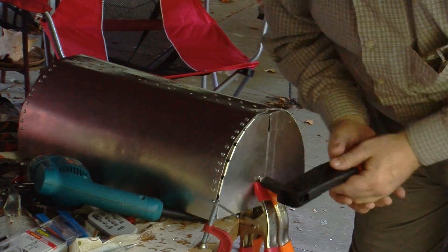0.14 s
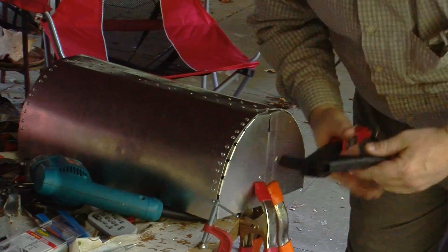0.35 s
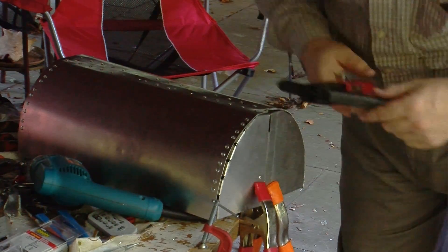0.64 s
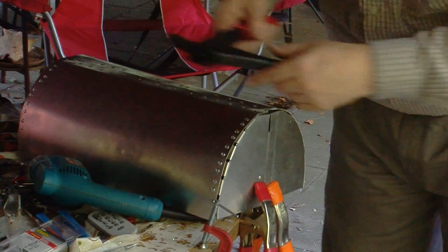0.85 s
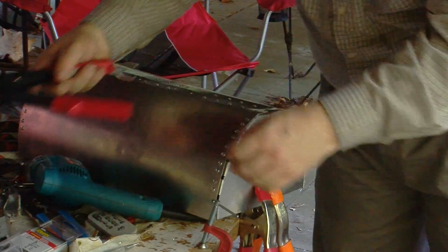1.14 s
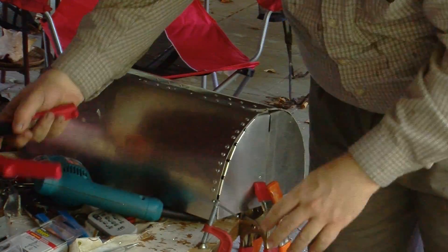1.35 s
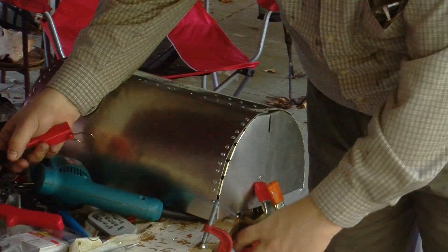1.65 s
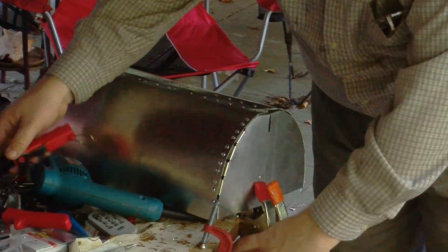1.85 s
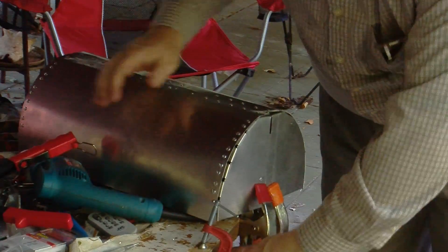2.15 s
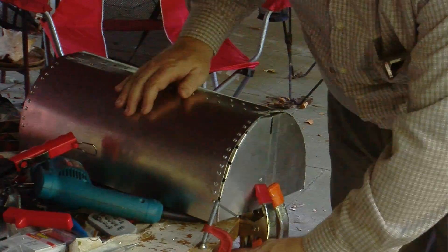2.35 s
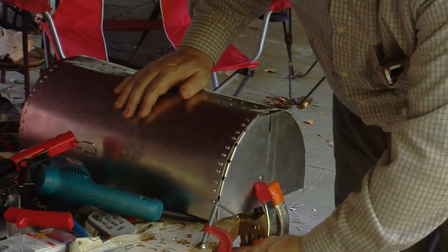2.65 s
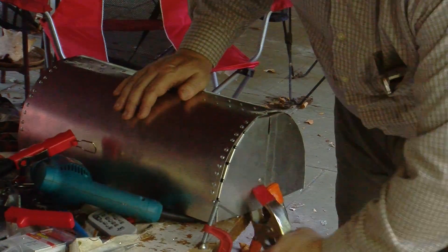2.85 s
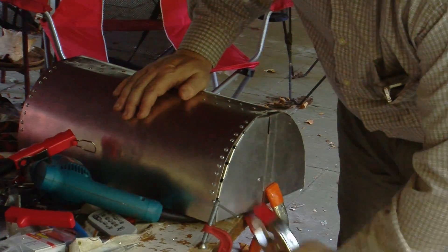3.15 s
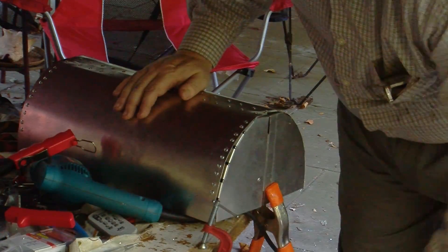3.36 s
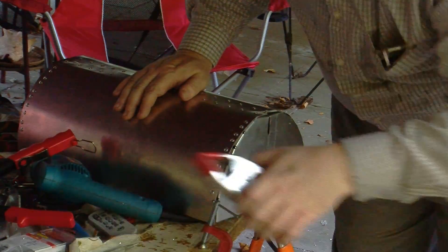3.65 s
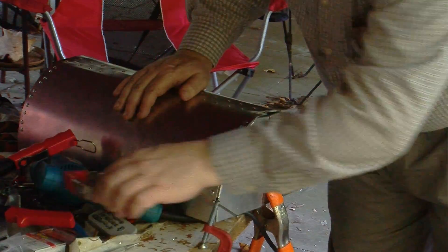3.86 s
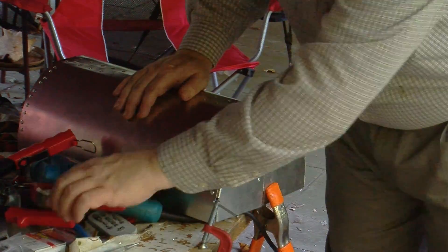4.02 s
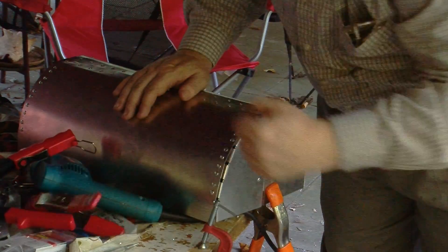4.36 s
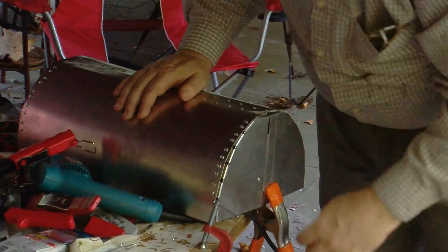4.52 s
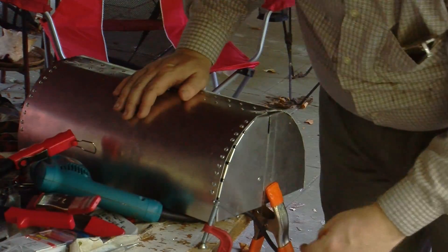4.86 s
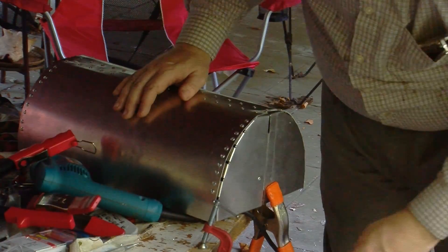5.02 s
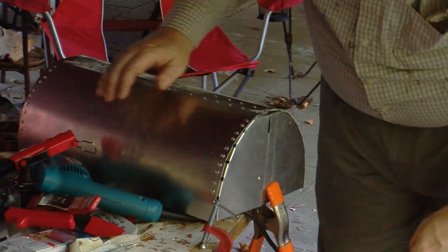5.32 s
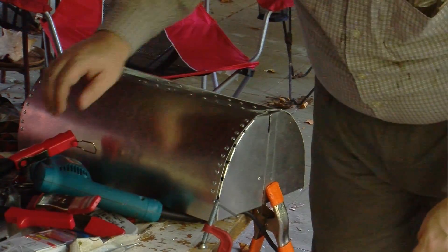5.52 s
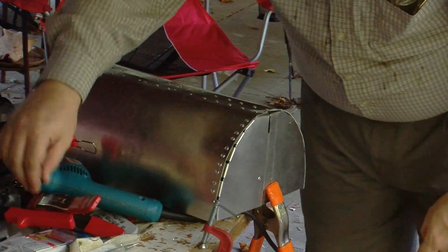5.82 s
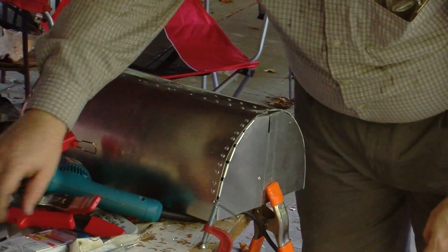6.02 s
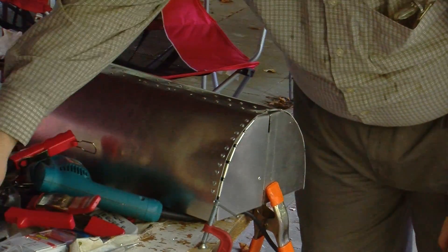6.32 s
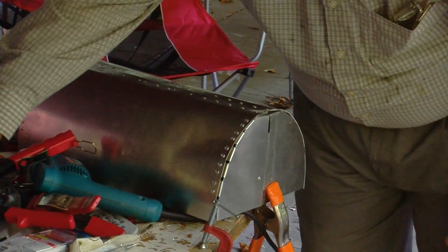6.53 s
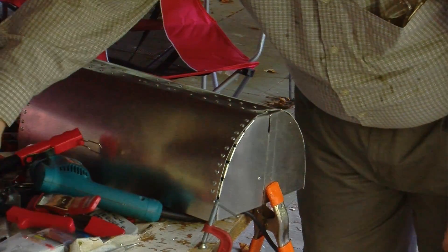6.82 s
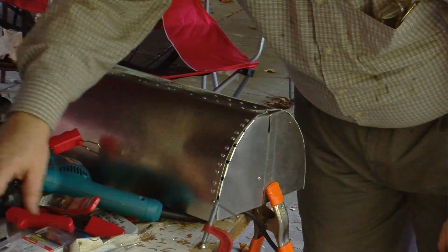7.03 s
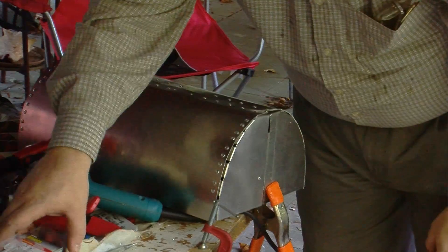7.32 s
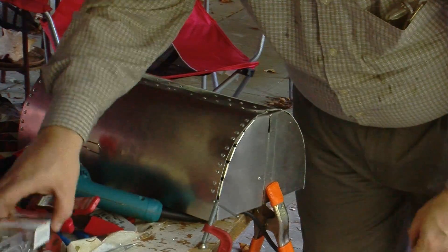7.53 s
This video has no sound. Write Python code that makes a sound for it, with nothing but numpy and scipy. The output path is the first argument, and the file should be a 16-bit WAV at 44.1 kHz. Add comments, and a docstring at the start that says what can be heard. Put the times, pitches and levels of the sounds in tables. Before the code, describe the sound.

One sharp crack with a short tinny ring, then hand tools knocking down on a bench and light rummaging over faint distant traffic.

```python
"""At a covered work place, a hand riveter snaps the stem of a pop rivet in a sheet-metal drum: a crack and
the ringing modes of the shell, with a low thud of the overloaded preamplifier, in the right channel.
The riveter and then a spring clamp are put down on a cluttered wooden bench, as decaying noise and modes;
a hand rummages among the tools, with grainy scrapes, steel ticks and faint rustles.
Short echoes surround the work; far traffic, air and a thin band of insects are shaped noise behind it."""
import sys
import numpy as np
from scipy import signal
from scipy.fft import rfft, irfft, next_fast_len
from scipy.io import wavfile
from scipy.ndimage import map_coordinates

SR = 44100
rng = np.random.default_rng(int(sys.argv[2]) if len(sys.argv) > 2 else 0)


def output_pcm(signal):
    """Save a mono or channel-first signal as 16-bit PCM at the path in sys.argv[1].

    Samples are clipped to [-1, 1] before scaling.
    """
    pcm = np.clip(np.atleast_2d(signal).T, -1, 1) * 32767
    wavfile.write(sys.argv[1], SR, np.round(pcm).astype(np.int16))


N = 338688

# Spectrum of hard contact. Each row: frequency in Hz, relative density in dB per Hz.
HARD_CONTACT = [(2000, 2), (3500, 5), (5000, 4.5), (6300, -2), (8500, -4), (10500, -9), (15500, -17.5)]


def rivet():
    """Impulsive excitation: the stem breaks, the preamplifier thuds and the shell rings in its modes."""
    # Strong modes of the drum's shell. Each row: frequency in Hz, relative level in dB.
    strong_modes = [(331, -52.5), (506.0, -57), (580, -54), (656.8, -56), (705.2, -57), (920.5, -58),
                    (1152, -58), (1250, -53), (1353, -60), (1822, -53.5), (2073, -59), (2239, -62),
                    (2385, -58.5), (2421, -57), (2939, -65), (3009, -66), (3165, -58), (3209, -57.5),
                    (3325, -62), (3413, -68.5)]
    # Faint highest modes of the shell. Each row: frequency in Hz, relative level in dB.
    faint_modes = [(4113, -63), (4511, -62), (5276, -61.5), (5405, -65.5), (6094, -62), (6826, -65.5),
                   (8936, -67)]
    # Decay of these modes. Each row: frequency in Hz, t60 in seconds.
    mode_t60 = [(200, 0.22), (600, 0.35), (1300, .28), (3200, 0.31), (7000, 0.17)]
    # Tilt of the first burst, brighter than the ring. Each row: frequency in Hz, gain in dB.
    crack_tilt = [(100, -3), (310, -10), (590, 1), (1200, -0.5), (3200, 1), (7000, -2), (15000, 3.5)]
    # The many weak modes of the shell. Each row: frequency in Hz, relative density in dB per Hz.
    weak_modes = [(60, -45.5), (200, -29), (800, -18), (2800, -16.5), (6000, -20.5), (9500, -22.5),
                  (15500, -32.5)]
    # Groups into which weak modes crowd. Each row: centre in Hz, width in Hz, relative level in dB.
    mode_groups = [(299.6, 200, -2), (627, 38, 2.5), (934, 100, -3.5), (1235.4, 78, -2), (1825, 170, -2.5),
                   (2416, 59, -7.5), (3240, 210, -3.5), (4370, 290, -17.5), (5403, 290, -13),
                   (6940, 410, -17.5), (8850, 540, -19.5)]
    # Decay of the weak modes. Each row: frequency in Hz, t60 in seconds.
    weak_t60 = [(150, 0.38), (600, .32), (2000, 0.37), (5000, 0.37), (12000, 0.25)]
    # Reflection from a far wall. Each row: frequency in Hz, relative gain in dB.
    wall_reflection = [(100, -17), (300, 10), (650, 11), (1100, -11), (2200, -24), (9000, -12)]
    snap_s, wall_delay_s = 0.0265, 0.085

    def shell(hz):
        """Modal density: the weak modes form a broad response with crowded groups on top."""
        groups = sum(amp(db) * hump(hz, centre, width) for centre, width, db in mode_groups)
        return amp(along(weak_modes, hz)) + groups

    out = np.zeros(N)
    t = np.arange(SR) / SR
    crack = amp(-5.5) * unit(filtered(noise(crack_tilt, len(t)), shell)) * fade(t, 0.069)
    # a low thud of the overloaded preamplifier
    low_push_spectrum = [(20, 5), (60, -1), (100, -8.5), (170, -11), (500, -70.5)]  # (Hz, dB per Hz)
    low_push = amp(-25) * noise(low_push_spectrum, len(t)) * fade(t, 0.12)
    shiver = amp(-22.0) * dying(unit(filtered(rng.standard_normal(len(t)), shell)), weak_t60)
    ring = sum(amp(db) * mode(hz, t, along(mode_t60, hz)) for hz, db in [*strong_modes, *faint_modes])
    onset = 1 - np.exp(-t / 0.000304)
    add(out, snap_s, (crack + low_push + shiver + amp(25.5) * ring) * onset)
    # a far wall throws the body of the bang back
    echo = amp(-25.5) * filtered(out, lambda hz: amp(along(wall_reflection, hz)))
    add(out, wall_delay_s, echo)
    return out


def knocks():
    """Impact: each landing is a click, a clack with the tool's modes, and a thump of the bench top."""
    # Tools landing on the bench and on each other. Each row: start in seconds, tool, then relative
    # levels of landing, thump and click in dB, and body resonance in Hz.
    landings = [(1.652, "clutter", -32.5, -27, -16, 590), (1.659, "clutter", -24.5, -30, -28, 690),
                (1.708, "riveter", -36, -32, -2.5, 730), (1.853, "riveter", -20.5, -10.5, -9.5, 543),
                (2.024, "riveter", -23.5, -7.5, -13, 667), (3.011, "clutter", -38.5, -11, -22, 607),
                (4.181, "clamp", -37.5, -12.5, -1.5, 840), (4.188, "clamp", -32, -29, -15.5, 554),
                (4.293, "clutter", -34.5, -37, -16, 546), (4.384, "clutter", -34.5, -35, -21, 810),
                (4.43, "clutter", -37.5, -33, -24, 690), (4.471, "clamp", -33.5, 1, -9, 478),
                (4.482, "clamp", -22.5, -12, -11.5, 712), (6.841, "clutter", -47, -1, -19, 685),
                (6.89, "clutter", -37, -12, -7, 530), (6.932, "clutter", -38, -33, -7.5, 498),
                (6.966, "clutter", -32.5, -33, -19, 680), (7.409, "clutter", -30.5, -35, -24, 666)]
    # Modes of each struck tool. Each row: frequency in Hz, relative level in dB, t60 in seconds.
    tool_modes = {"riveter": [(1120, -11.5, .03), (2390, -3, 0.021), (4660, -21, 0.018), (5470, -18, 0.028),
                  (7320, -21, 0.022)], "clamp": [(1670, -5.5, 0.024), (2090, -3, 0.019), (2900, -14, .03),
                  (3610, -9, 0.023), (4320, -6, 0.018), (5250, -14.5, 0.023)],
                  "clutter": [(1071, -3, 0.027), (1464, -15.5, 0.034), (2110, -21, 0.069),
                  (3280, -34, 0.023)]}
    # Noise of the tool bodies. Each row: frequency in Hz, relative density in dB per Hz.
    clack_spectrum = [(240, -45), (400, -12.5), (686, -1), (1120, -6.5), (1430, -17), (1620, -8),
                      (1870, -15), (2350, -6.5), (2910, -12.5), (3670, -29), (4000, -52), (5200, -44),
                      (8800, -120)]
    # Bench modes. Each row: nominal frequency in Hz, mean relative level in dB, t60 in seconds.
    bench_modes = [(125, -11, 0.36), (153.4, -1.5, 0.25), (183, -.5, .19), (214.6, 6, 0.083),
                   (267, -3.5, 0.21), (336.7, -2.5, .2), (367, -1, 0.061)]
    # How low each tool can shake the bench. Each entry: tool, edge in Hz.
    lowest_hz = {"riveter": 121, "clamp": 205, "clutter": 151}
    clack_t60, click_t60 = 0.038, 0.033  # s

    out = np.zeros(N)
    t = np.arange(SR // 2) / SR
    contact = 1 - np.exp(-t / 0.0008)
    for s, name, db, thump_db, click_db, body_hz in landings:
        clack = amp(-6.0) * noise(clack_spectrum, len(t)) * fade(t, clack_t60)
        body = amp(-7) * mode(body_hz, t, t60=0.061)
        ring = body + sum(amp(level) * mode(hz, t, life) for hz, level, life in tool_modes[name])
        click = amp(click_db + 1.5) * noise(HARD_CONTACT, len(t)) * fade(t, click_t60)
        tool = with_room(clack * contact + click, wet_db=-6.0) + with_room(ring * contact, wet_db=-12.5)
        # the bench's modes swing up together, each at a new strength and slightly new pitch
        strengths_db = rng.normal(0, 2, len(bench_modes))
        thump = np.zeros(len(t))
        for (hz, level, life), extra_db in zip(bench_modes, strengths_db):
            detuned_hz = hz * rng.normal(1, 0.014)
            thump += amp(level + extra_db) * np.sin(2 * np.pi * detuned_hz * t) * fade(t, life)
        swing_up = 1 - np.exp(-(t / 0.0021) ** 2)
        thump = amp(thump_db - 2.0) * high_pass(thump * swing_up, lowest_hz[name])
        add(out, s, amp(db + 1.0) * (tool + thump))
    return out


def drags():
    """Stick-slip friction: sliding tools catch and slip in grains, scratch, and shake the bench."""
    # Tools dragged over the bench. Each row: start in seconds, length in seconds before release,
    # relative scrape level in dB, relative bench rumble level in dB.
    pushes = [(1.656, 0.03, -31.5, -52), (1.711, 0.051, -34.5, -42), (1.77, 0.049, -34.5, -60),
              (1.857, 0.047, -37.5, -41), (2.972, 0.057, -53, -56), (3.192, 0.091, -57, -55),
              (4.187, 0.068, -46.5, -48.5), (4.268, 0.038, -42, -76), (6.848, 0.11, -54.5, -46.5),
              (6.97, 0.071, -40, -58.5), (7.396, 0.017, -37.5, -62)]
    # Sliding noise. Each row: frequency in Hz, relative density in dB per Hz.
    sliding_spectrum = [(240, -27), (400, -27), (680, 5), (804, -8.5), (1100, 0.5), (1230, -9), (1430, -11),
                        (2090, -9.5), (2790, -15.5), (4670, -26), (5600, -31), (7580, -31.5),
                        (15000, -43.5)]

    scrape, rumble = np.zeros(N), np.zeros(N)
    for s, length, scrape_db, rumble_db in pushes:
        shove = stroke(s, length, attack_s=0.011, sag_db=7, release_s=0.13)
        scrape += amp(scrape_db) * shove
        rumble += amp(rumble_db) * shove
    # a thin steel part sings along with the sliding
    singing = lambda hz: 1 + amp(9.0) * hump(hz, centre_hz=4790, width_hz=170)
    grit = filtered(noise(sliding_spectrum, N), singing)
    slips = unit(amp(3.3 * wobble(450)) * grit)
    scratches = unit(amp(6 * wobble(500)) * noise(HARD_CONTACT, N))
    wood = noise([(80, -54), (150, -6), (330, -6), (500, -13.0), (900, -48.0)], N)
    sliding = amp(-1.5) * scrape * (slips + amp(-15.5) * scratches)
    return with_room(sliding + amp(-1) * rumble * wood, wet_db=-6.0)


def ticks():
    """Light impact of small steel parts: broadband contact noise with one very brief resonance."""
    # Touches of jaws, springs and small parts. Each row: start in seconds, relative level in dB,
    # resonance in Hz, relative ring level in dB.
    touches = [(.296, -39.5, 4300, -1), (.388, -43, 2970, 6), (.392, -35.5, 2890, 8.5),
               (.477, -41, 3060, 3), (.661, -44.5, 7000, -8), (3.045, -46.5, 3450, 0),
               (3.262, -49.5, 4660, -1), (3.333, -42.5, 3200, -14), (3.425, -51, 3210, 1),
               (4.372, -53, 5060, 7), (6.14, -57, 4240, -3), (6.339, -48, 2840, -1), (6.417, -50, 3960, -6),
               (6.933, -34, 3400, 1), (7.49, -44, 4700, -2), (7.604, -46.5, 2930, 0)]
    # Noise of small steel parts. Each row: frequency in Hz, relative density in dB per Hz.
    steel_spectrum = [(500, -11), (1200, 8), (2500, 17.5), (5000, 3), (8500, -1.5), (10500, -13),
                      (15000, -13.5)]

    out = np.zeros(N)
    t = np.arange(SR // 3) / SR
    onset = 1 - np.exp(-t / 0.0005)
    for s, db, ring_hz, ring_db in touches:
        contact = with_room(noise(steel_spectrum, len(t)) * fade(t, 0.036) * onset, wet_db=-7.5)
        ring = amp(ring_db) * mode(ring_hz, t, t60=0.023)
        add(out, s, amp(db - 6.5) * (contact + ring))
    return out


def brushes():
    """Soft friction: cloth and skin rustle faintly in fine, uneven grains."""
    # A sleeve and fingers brushing over the clutter. Each row: start in seconds, length in seconds
    # before release, relative level in dB.
    rubs = [(2.3, .13, -71), (2.89, 0.15, -67.5), (3.187, 0.17, -70), (7.346, 0.23, -63.5)]
    pressure = sum(amp(db) * stroke(s, length, attack_s=0.03, sag_db=2, release_s=0.22)
                   for s, length, db in rubs)
    cloth = noise([(1500, -24.5), (3500, 0.5), (5000, 3), (8500, -5), (10500, -8.5), (15000, -11.0)], N)
    return amp(-4) * pressure * unit(amp(4 * wobble(250)) * cloth)


def outdoors():
    """Stationary noise and distance: traffic recedes over a steady murmur of air and insects."""
    # Far traffic. Each row: frequency in Hz, relative density in dB per Hz.
    traffic_spectrum = [(150, -25.5), (350, -9), (650, 1), (1100, 1), (2200, -5.5), (3300, -15.5),
                        (6000, -32.5), (12000, -53)]
    # Murmur of the air. Each row: frequency in Hz, relative density in dB per Hz.
    air_spectrum = [(20, -20.5), (60, -12.5), (110, -6.5), (155, 1.5), (220, -7), (450, -6.5), (800, -5.5),
                    (1200, -12), (2200, -16.5), (3300, -24.5), (5500, -32), (8500, -34.5), (10000, -37.5),
                    (16000, -39.5)]
    # Thin band of insects. Each row: frequency in Hz, relative density in dB per Hz.
    insect_spectrum = [(5900, -39.5), (6200, -3.5), (6380, -0.5), (6650, -6.5), (6830, -1.5), (7050, -19),
                       (7700, -13.5), (8500, -40.5)]
    traffic_gone_s = 7.5
    receding = np.maximum(1 - np.arange(N) / SR / traffic_gone_s, 0)
    traffic = receding * amp(-56 + 0.44 * wobble(17.0)) * noise(traffic_spectrum, N)
    air = amp(-58.5 + 0.22 * wobble(3.2)) * noise(air_spectrum, N)
    insects = amp(-80 + 1.1 * wobble(12)) * noise(insect_spectrum, N)
    return traffic + air + insects


def with_room(x, wet_db):
    """Diffuse reverberation: add a fresh noise tail that builds up as the walls answer, then decays."""
    # Decay of the room. Each row: frequency in Hz, t60 in seconds.
    echo_t60 = [(150, 0.33), (600, 0.34), (2500, 0.31), (6000, 0.262), (13000, 0.21)]
    t = np.arange(SR // 2) / SR
    build_up = 1 - np.exp(-(t / 0.0055) ** 2)
    tail = dying(rng.standard_normal(len(t)), echo_t60) * build_up
    return x + amp(wet_db) * signal.fftconvolve(x, tail / np.linalg.norm(tail))[:len(x)]


def microphone(x, low_hz, shelf_hz, shelf_db):
    """Transducer response: the capsule thins the deep bass and steps down in the high treble."""
    x = signal.sosfilt(signal.butter(1, low_hz, "high", fs=SR, output="sos"), x)
    return filtered(x, lambda hz: amp(shelf_db * (1 + np.tanh((hz - shelf_hz) / 300)) / 2))


def stroke(s, length, attack_s, sag_db, release_s):
    """Force envelope of a hand movement: it sets in, loses force and is released (t60 release_s)."""
    t = np.maximum(np.arange(N) / SR - s, 0)
    attack = np.minimum(t / attack_s, 1)
    sag = amp(-sag_db * np.minimum(t / length, 1))
    return attack * sag * fade(np.maximum(t - length, 0), release_s)


def mode(hz, t, t60):
    """Modal vibration: a decaying sine with random phase."""
    return np.sin(2 * np.pi * (hz * t + rng.random())) * fade(t, t60)


def hump(hz, centre_hz, width_hz):
    """Resonance gain: 1 at the centre, about 3 dB less at half the width to either side."""
    return 1 / (1 + (1.3 * (hz - centre_hz) / width_hz) ** 2)


def fade(t, t60):
    """Exponential decay: 60 dB in t60 seconds."""
    return np.exp(-np.log(1000) * t / t60)


def dying(x, t60s):
    """Frequency-dependent damping: each band of x decays with its own t60."""
    hz, t, z = signal.stft(x, SR, nperseg=256)
    decay = amp(-60 * t / along(t60s, hz)[:, None])
    return signal.istft(z * decay, SR)[1][:len(x)]


def noise(spectrum, size):
    """Spectral shaping: white noise coloured by (Hz, dB) points and scaled to rms 1."""
    return unit(filtered(rng.standard_normal(size), lambda hz: amp(along(spectrum, hz))))


def wobble(rate):
    """Random modulation: a smooth curve through rate random knots a second."""
    knots = rng.standard_normal(int(N * rate / SR) + 4)
    return map_coordinates(knots, [np.arange(N) * rate / SR])


def filtered(x, response):
    """Linear filtering: multiply the spectrum of x by a response of frequency."""
    m = next_fast_len(len(x) + 8192)  # zero padding against wrap-around
    return irfft(rfft(x, m) * response(np.fft.rfftfreq(m, 1 / SR)), m)[:len(x)]


def high_pass(x, edge_hz):
    """Third-order high-pass: weaken what lies below the edge."""
    return signal.sosfilt(signal.butter(3, edge_hz, "high", fs=SR, output="sos"), x)


def along(points, hz):
    """Logarithmic pitch scale: interpolate (Hz, value) points on a log frequency axis."""
    f, v = np.transpose(points)
    return np.interp(np.log(hz + 1), np.log(f + 1), v)


def amp(db):
    """Level law: decibels to amplitude gain."""
    return 10 ** (np.asarray(db) / 20)


def unit(x):
    """Power normalisation: scale to rms 1."""
    return x / np.sqrt(np.mean(x ** 2) + 1e-20)


def add(track, s, sound):
    """Superposition: mix a sound into the track from s seconds on."""
    part = track[max(round(s * SR), 0):][:len(sound)]
    part += sound[:len(part)]


def scene():
    """Superposition: the work, as the microphone hears it, and the outdoor background sum in the
    right channel only."""
    work = rivet() + knocks() + ticks() + drags() + brushes()
    sound = microphone(work, low_hz=70, shelf_hz=9400, shelf_db=-4.5) + outdoors()
    return np.array([np.zeros(N), 2 * sound])


def record(dry):
    """Saturation: the preamplifier limits loud peaks; faint hiss joins, then the band is limited."""
    top_hz = 15850
    clipped = dry / (1 + np.abs(dry / 0.6) ** 6) ** (1 / 6)
    hiss = amp(-94.5) * rng.standard_normal(dry.shape)
    return np.array([filtered(channel, lambda hz: hz < top_hz) for channel in clipped + hiss])


dry = scene()
out = record(dry)
output_pcm(out)
```